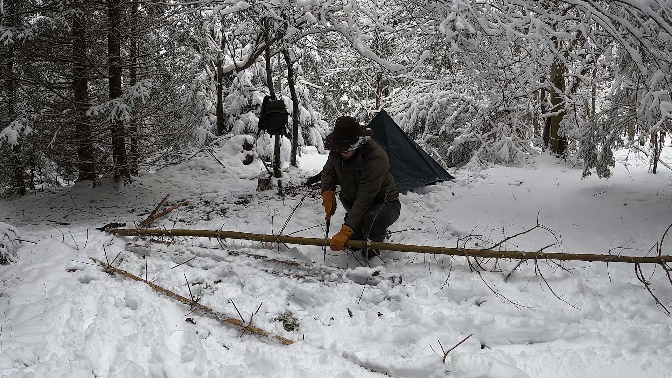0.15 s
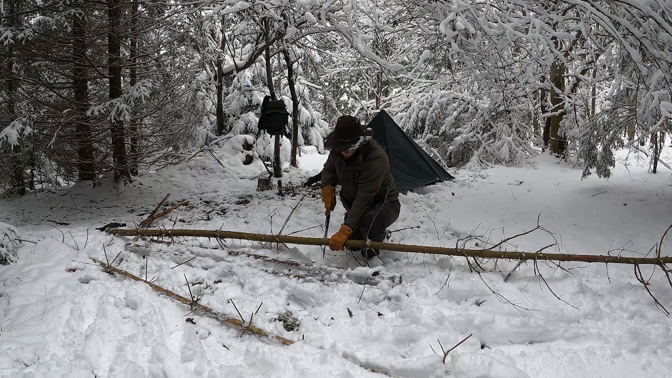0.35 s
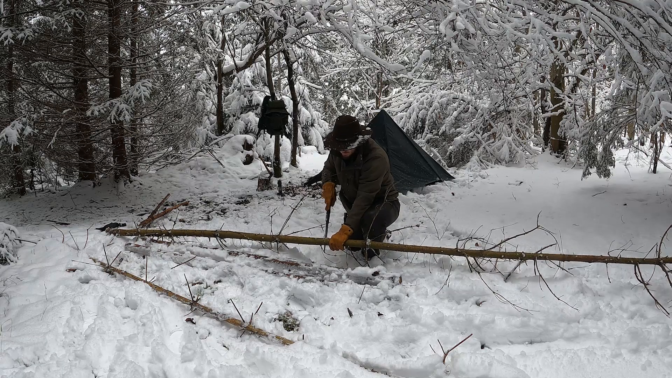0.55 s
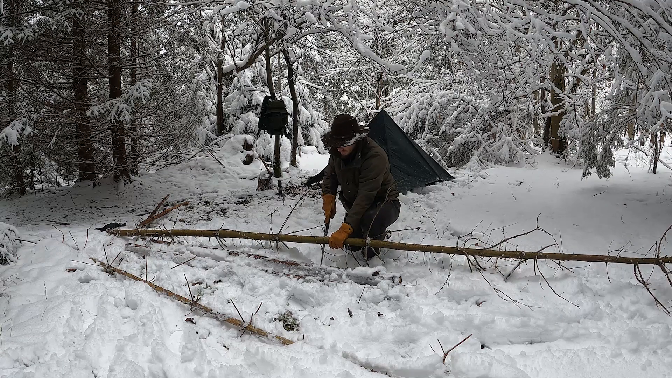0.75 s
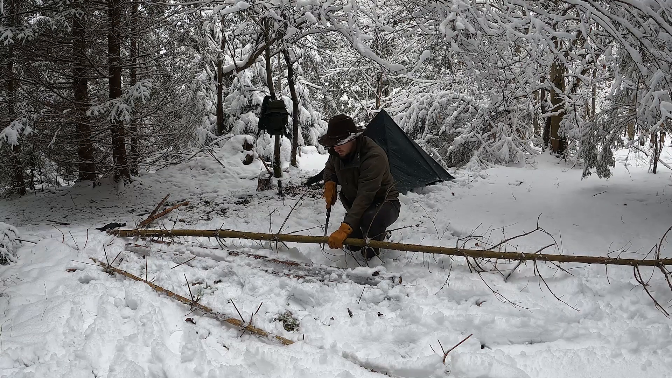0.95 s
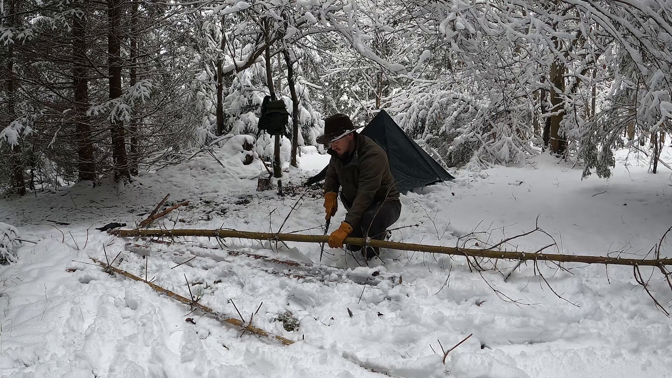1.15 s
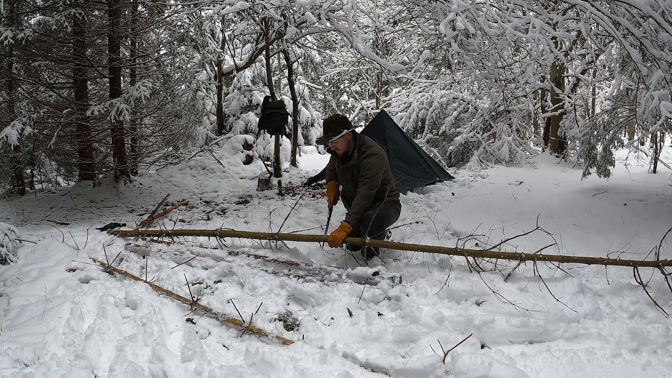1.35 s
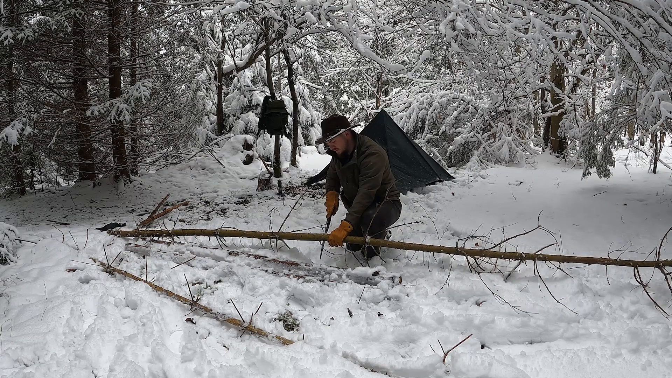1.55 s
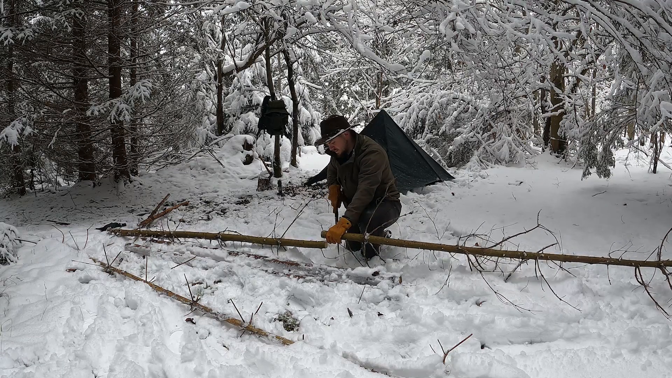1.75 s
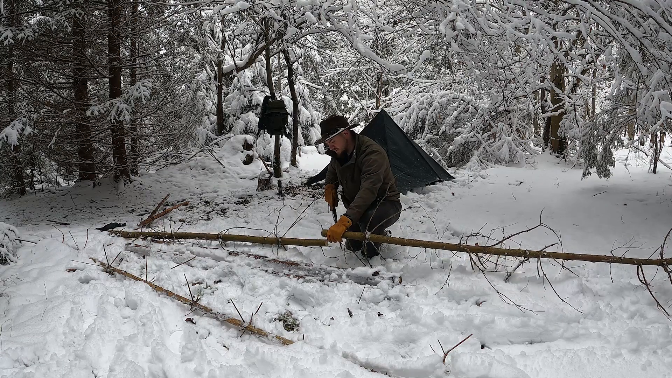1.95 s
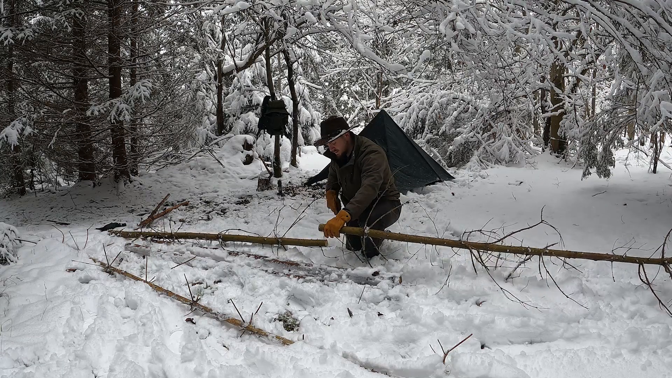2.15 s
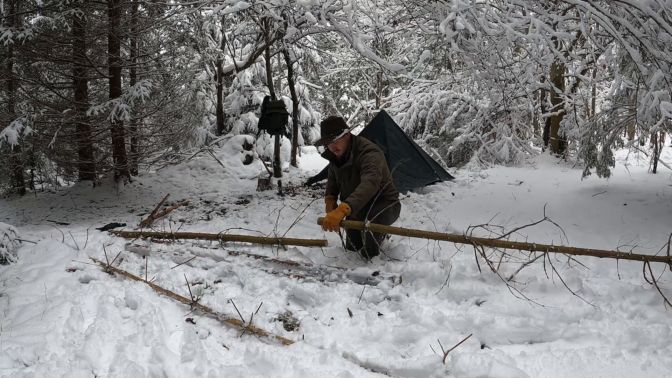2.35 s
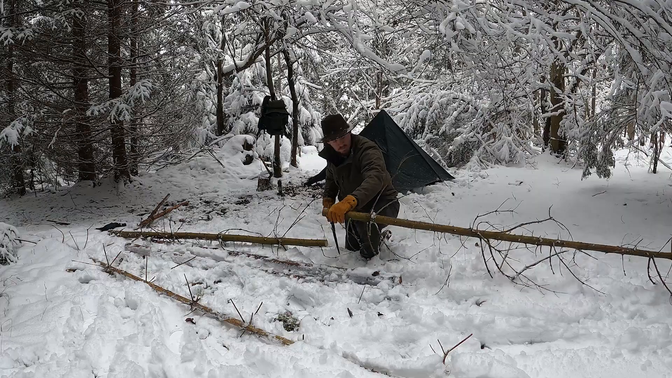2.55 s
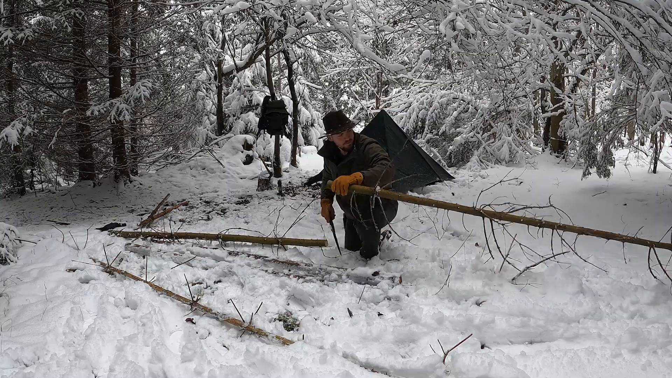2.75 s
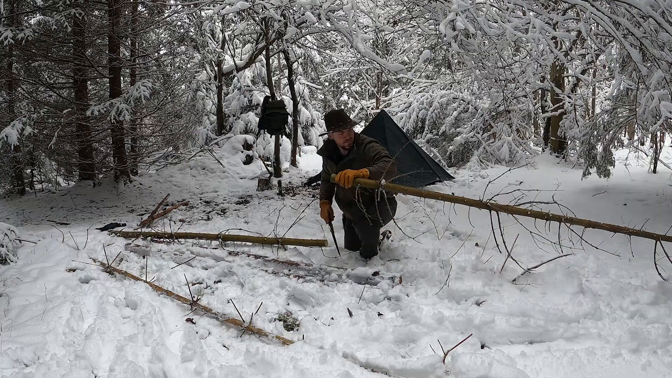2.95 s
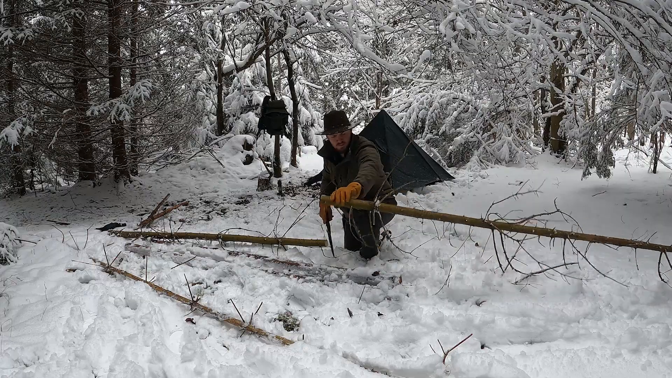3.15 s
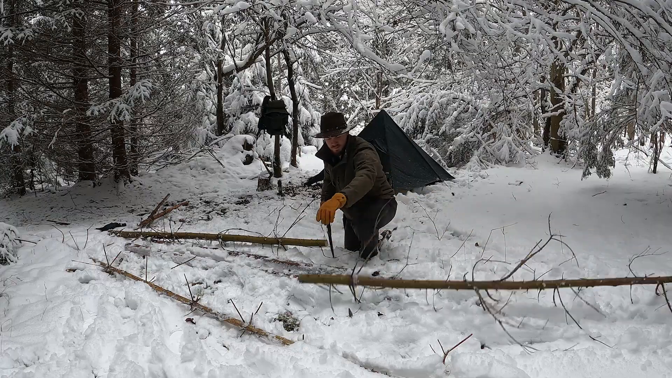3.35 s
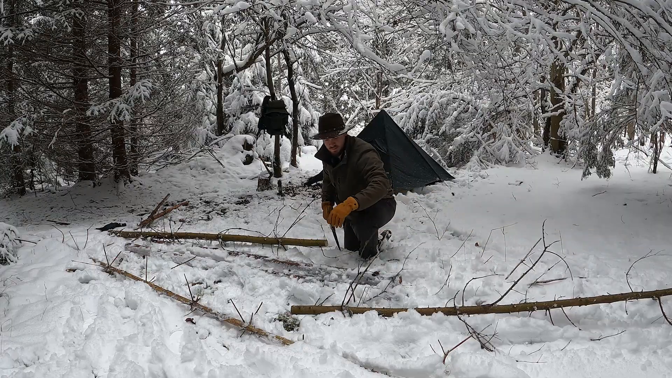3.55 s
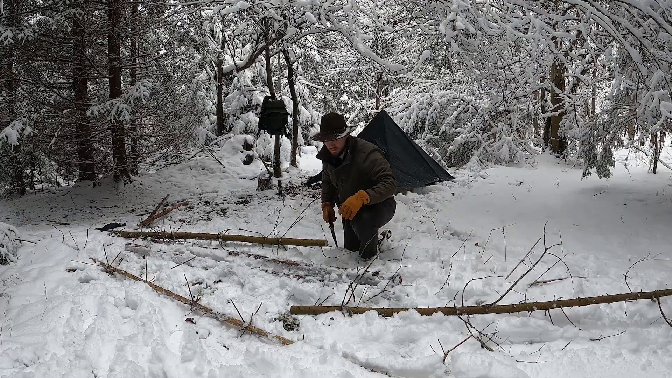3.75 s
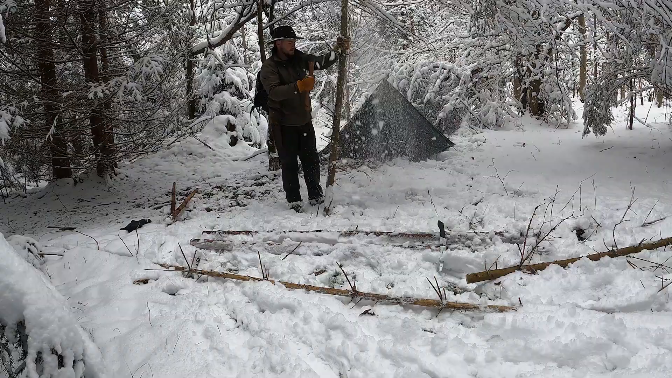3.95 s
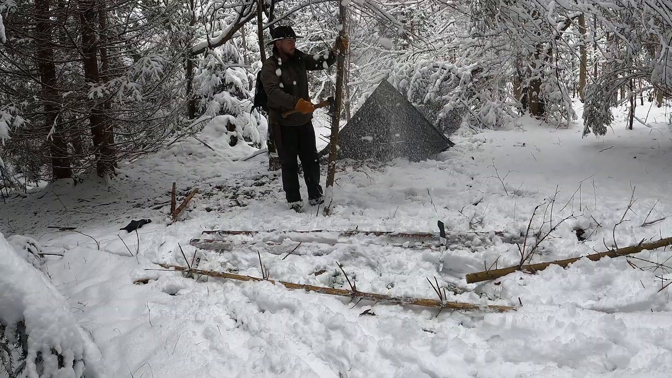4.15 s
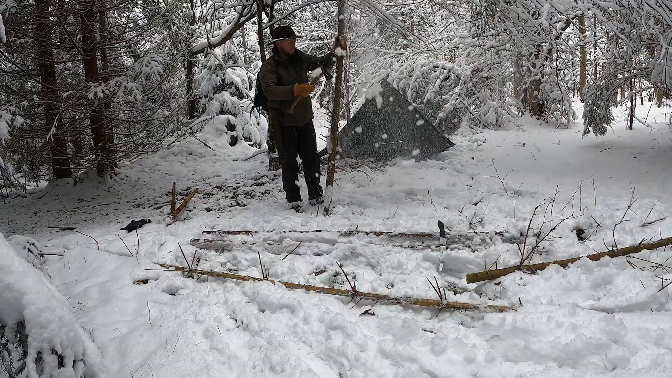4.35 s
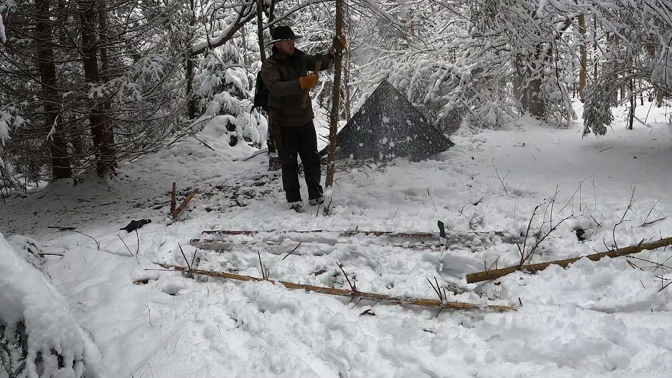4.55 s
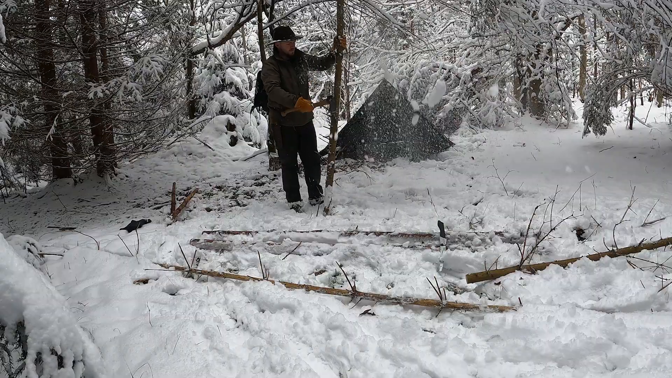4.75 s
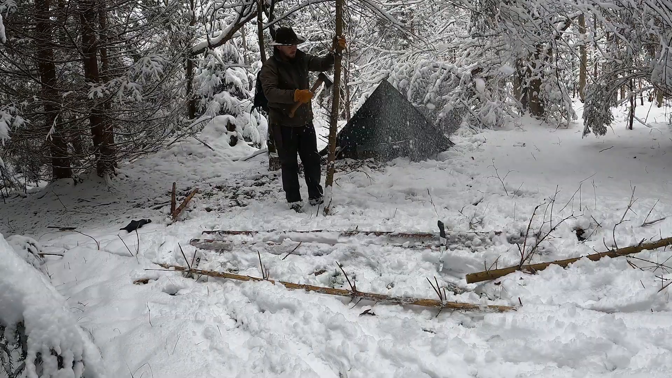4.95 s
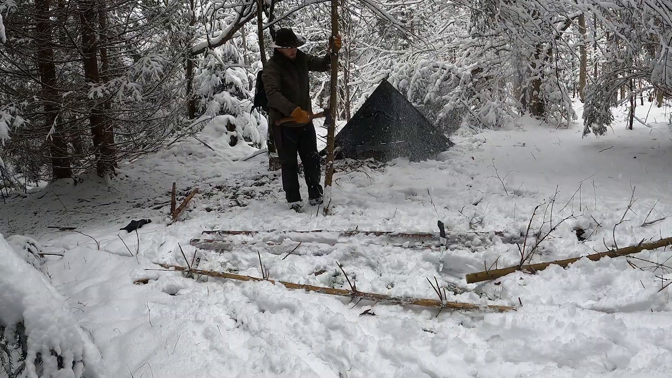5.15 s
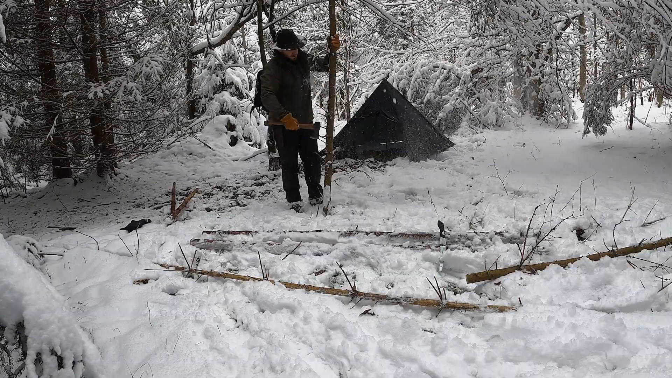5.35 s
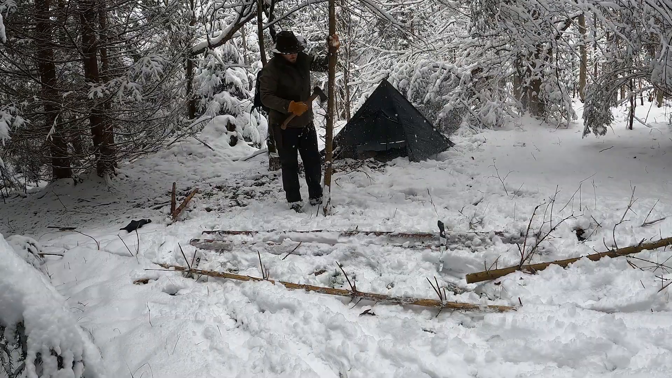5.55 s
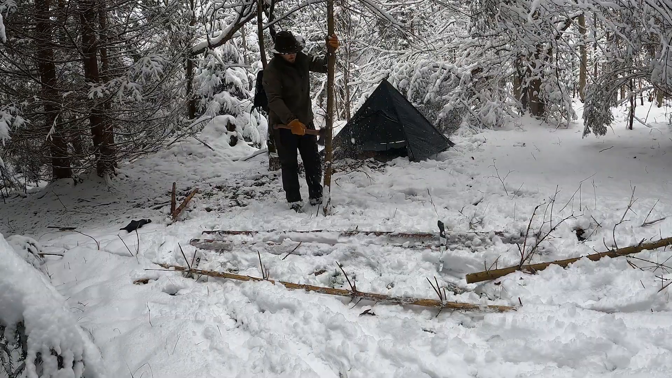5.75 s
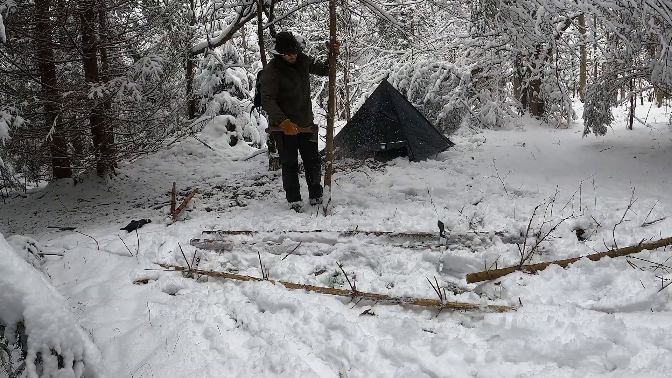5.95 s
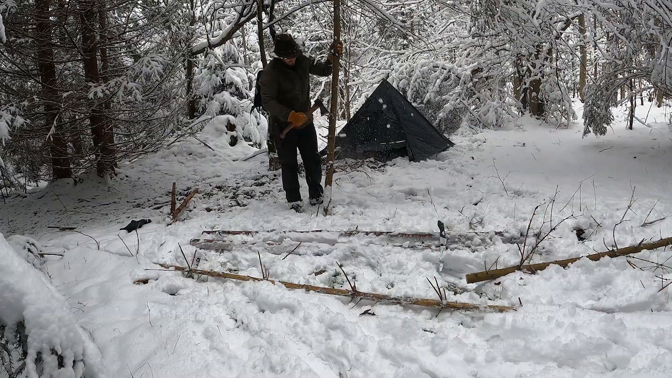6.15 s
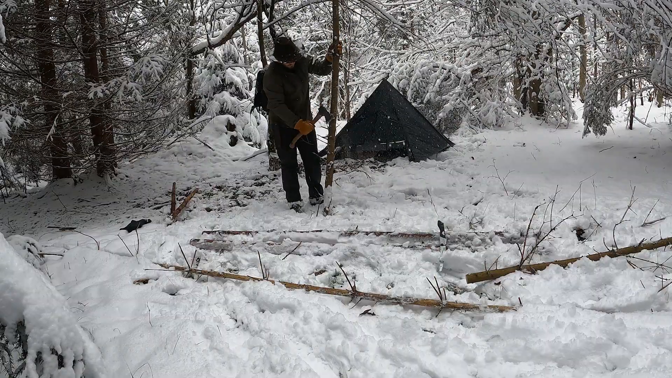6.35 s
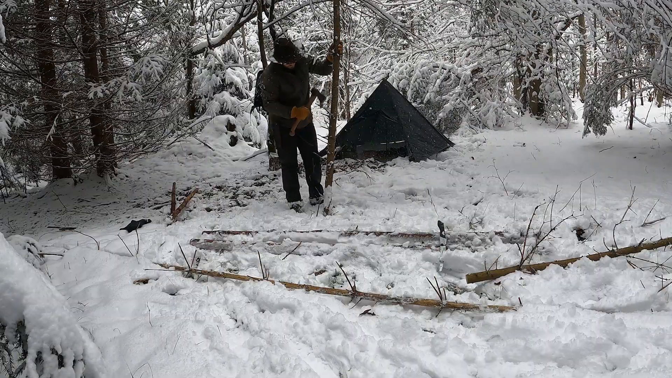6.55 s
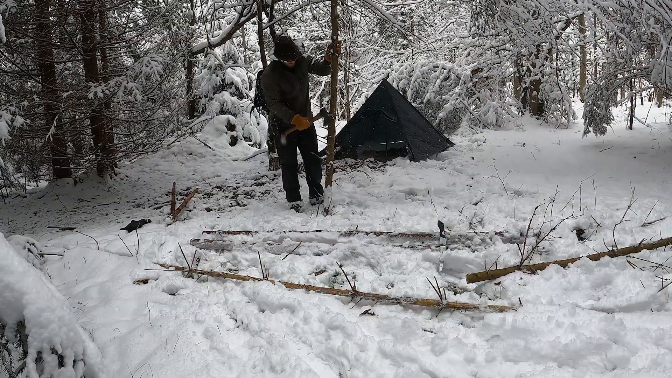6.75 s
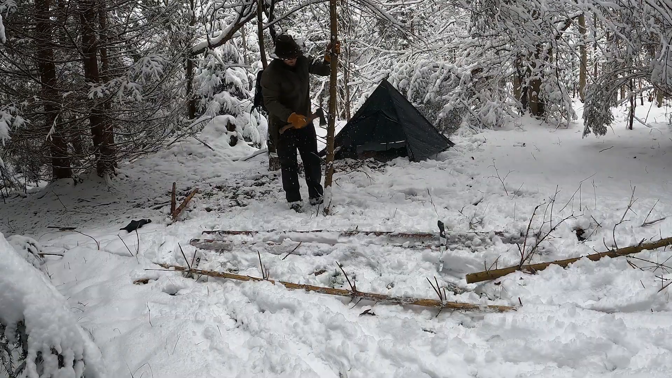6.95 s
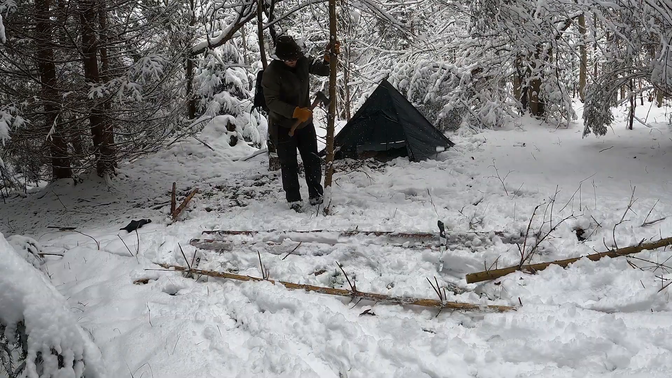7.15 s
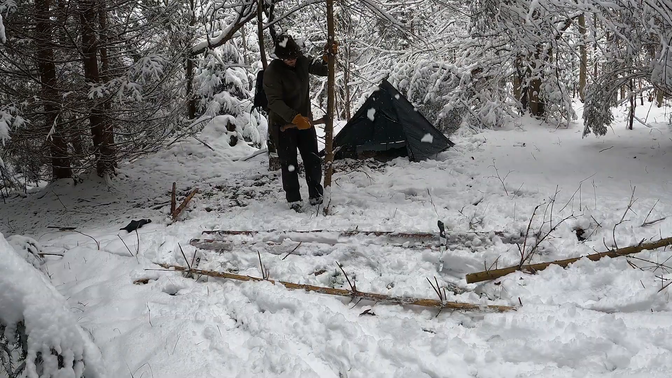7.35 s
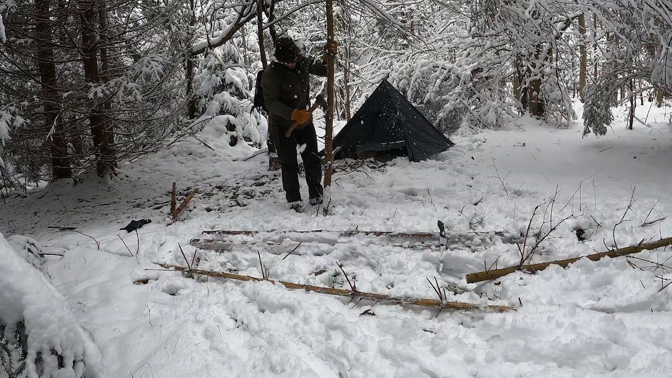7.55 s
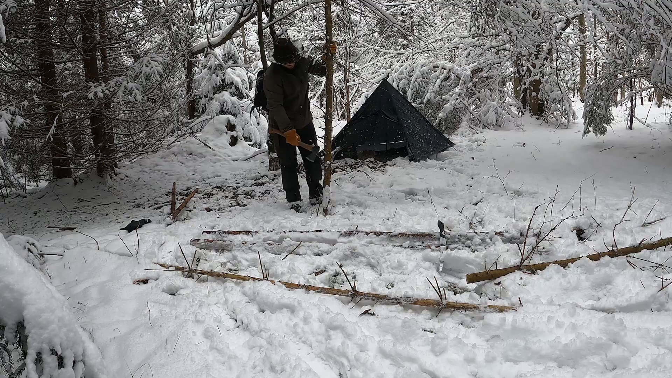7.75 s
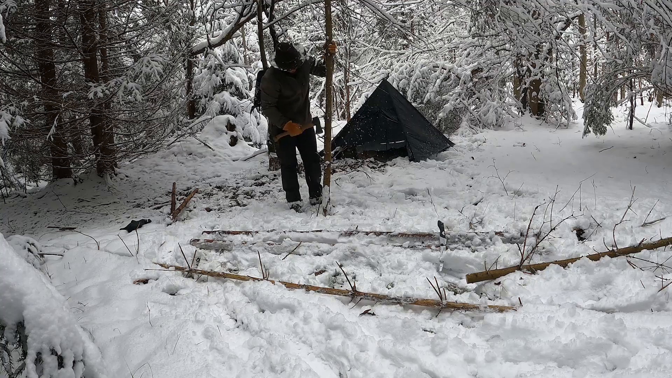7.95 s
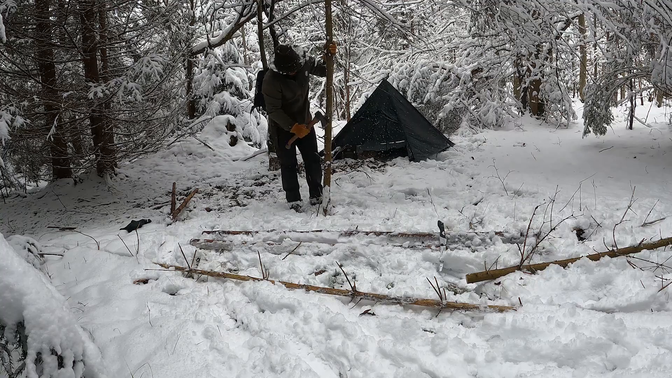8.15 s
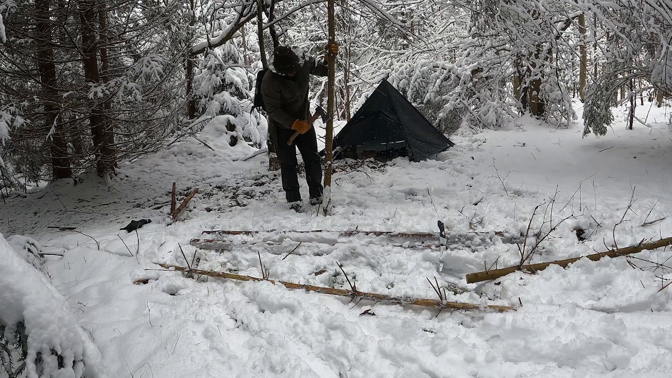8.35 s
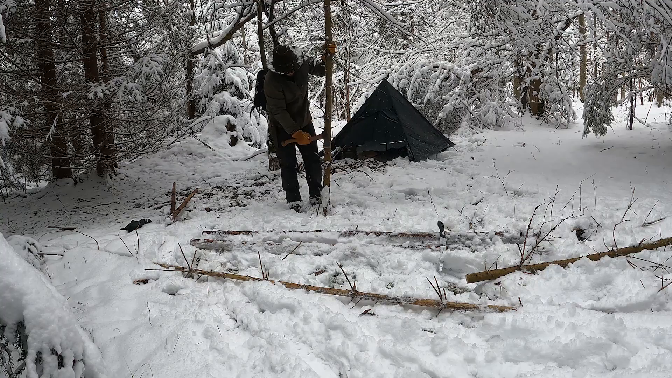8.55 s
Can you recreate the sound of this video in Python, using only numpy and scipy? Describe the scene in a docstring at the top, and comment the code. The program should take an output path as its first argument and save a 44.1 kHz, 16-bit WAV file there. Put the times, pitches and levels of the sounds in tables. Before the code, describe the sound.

A hand saw rasps through a thin pole, the cut top cracks down into snow, then a hatchet knocks off dry twigs outdoors.

```python
"""Sawing and trimming poles in a snowy forest

A hand saw cuts a thin pole, made of uneven noise rung through pole and blade; the top is thrown down, twigs cracking.
Then a hatchet trims dry branches: noise bursts for knocks and snaps, sine tones for twigs and a short steel ring.
Twigs and snow rustle down as lumpy stereo noise, with soft noise puffs where wood meets snow.
Drops of snow thump on the microphone housing as short sinking tones; filtered noise rumbles far off."""
import sys
import numpy as np
from scipy import signal
from scipy.fft import rfft, irfft, next_fast_len
from scipy.io import wavfile
from scipy.ndimage import uniform_filter1d, map_coordinates

SR = 44100
rng = np.random.default_rng(int(sys.argv[2]) if len(sys.argv) > 2 else 0)


def master(y):
    """Save y as 16-bit WAV."""
    cut = np.clip(np.atleast_2d(y).T, -1, 1)
    pcm = np.round(cut * 32767)  # scale
    wavfile.write(sys.argv[1], SR, pcm.astype(np.int16))


N = 378819

# saw strokes, pull and push in turn: fastest_s, slowing_s, level_db, blade_over_wood_db
SAW_STROKES = [(.03, 0.057, -43.5, -5.5), (.205, 0.052, -41, -7), (.335, 0.088, -41, -2.5),
               (.52, 0.055, -39.5, -5), (.66, 0.092, -40.5, -2.5), (.85, 0.066, -41.5, -3.5),
               (1.005, 0.097, -39.5, -3), (1.21, .064, -46, -1), (1.357, 0.091, -40.5, -1),
               (1.565, 0.06, -46, -4), (1.69, 0.057, -50.5, -6.5), (1.8, 0.29, -53, -4)]
SPEED_UP_S = 0.091  # every stroke takes this long to reach full speed
# the pole as it rings under a pull and under a push: pitch_hz, width_hz, relative_level_db
POLE_PULLED = [(540, 130, -9.5), (677, 29, 0), (982, 182, 1.5), (1370, 454, -2.5), (2060, 900, -12.5)]
POLE_PUSHED = [(450, 140, -9), (688, 40, -0.5), (868, 45, 3), (1080, 260, -2), (2210, 1500, -18)]
# the saw blade: pitch_hz, width_hz, relative_level_db
SAW_BLADE = [(2890, 850, -1), (4500, 980, 1), (5180, 560, 2), (6860, 900, -2.5), (8330, 2320, -8.5)]

# far drone and light wind on the two microphone ports: time_s, drone_db, wind_db
RUMBLE_LEVELS = [(0.0, -64.5, -71), (1.8, -57, -77), (2.36, -66, -75), (3.28, -68, -78.5),
                 (3.73, -69.5, -63.5), (4.3, -63.5, -71.5), (6.62, -77.5, -77), (6.88, -68.5, -65),
                 (7.13, -75, -77), (8.59, -71, -77.5)]
# tone balance of the drone and of the wind: frequency_hz, relative_level_db
DRONE_TONE = [(70, -63), (135, -7.5), (200, -1), (310, -9.5), (490, -23.5), (900, -36.5)]
WIND_TONE = [(15, -27.5), (30, -4), (130, -21), (200, -72.5)]

# branches dragged and clothing, under everything: time_s, twigs_db, snow_hiss_db
SLOW_STIR = [(1.92, -67.5, -76), (2.18, -71, -70), (2.53, -73, -74.5), (2.82, -64, -64.5),
             (3.05, -72.5, -78.5), (3.5, -58, -60), (3.69, -59.5, -76), (3.83, -74.5, -70.5),
             (4.12, -69, -64.5), (4.41, -74, -71.5), (4.67, -71, -66.5), (5.04, -75, -70.5),
             (5.5, -66, -68.5), (6.15, -79.5, -75), (6.5, -58.5, -64), (6.8, -79, -78), (8.1, -64, -70),
             (8.5, -78, -75.5)]
# the pole is jolted and sheds twigs and snow: start_s, shaking_lasts_s, twigs_db, snow_hiss_db
SHAKES = [(3.485, 0.097, -56.5, -51.5), (4.18, 0.093, -51, -57), (4.729, 0.026, -53.5, -57),
          (4.847, .01, -55, -54), (5.281, 0.01, -41, -39), (5.582, 0.023, -56.5, -59.5),
          (5.799, .07, -48, -50.5), (6.002, 0.047, -58.5, -60), (6.194, .005, -59, -64.5),
          (6.363, 0.0072, -52.5, -58.5), (6.586, 0.029, -60.5, -61), (6.872, 0.0062, -45.5, -49.5),
          (7.338, 0.055, -50, -56.5), (7.761, 0.0059, -44.5, -50), (8.002, 0.015, -54.5, -65),
          (8.25, 0.0094, -56.5, -59), (8.432, 0.019, -65.5, -69.5), (8.59, 0.012, -62, -59.5)]
JOLT_DB_PER_S = 500  # how fast a shower comes
TWIGS_SETTLE_DB_PER_S, SNOW_SETTLE_DB_PER_S = 162, 177.5
# tone balance of twigs, sifting snow and the cut top swept over snow: frequency_hz, relative_level_db
TWIG_TONE = [(300, -15.5), (500, -10.5), (850, -15), (1100, -5.5), (1900, -6), (4200, -17.5), (6000, -44)]
SNOW_TONE = [(2500, -43), (3500, -15), (5300, 1), (7400, -2.5), (12200, -22), (14000, -34.5)]
SWEEP_TONE = [(1650, -36), (2800, -5.5), (5850, -4.5), (6930, -4), (12000, -15.5), (13800, -26),
              (15000, -45.5)]
THROWN_S = 3.83  # until here the hiss is the swept top, then snow sifting from the standing pole
SWEEP_PAN_DB = -1.5  # left minus right

# how long the trunks' answer lasts: frequency_hz, time_to_fall_60_db_s
TREE_DECAY = [(300, 0.24), (2200, 0.3), (10000, 0.14)]
# how loudly the trunks answer: frequency_hz, level_db
TREE_ECHO = [(300, -24), (2200, -20), (12000, -18)]

# tooth catches, cracks and snaps, peaking 2.5 ms after start_s:
# start_s, base_level_db, twig_pitch_hz, relative_treble_db, burst_time_to_fall_60_db_s
BLOWS = [(.369, -28.5, 5200, -5, 0.011), (.958, -26, 4960, -7, .012), (1.01, -20, 1165, -9.5, 0.02),
         (1.065, -26, 4100, -13.5, 0.013), (1.412, -35.5, 4000, -3, .012), (1.645, -39, 3020, -4, .015),
         (1.658, -46, 7400, 3, .02), (1.735, -38, 1470, 1, 0.023), (1.823, -34, 1840, -6, 0.018),
         (1.857, -39, 1900, -23.5, 0.03), (1.898, -30, 1446, -21, 0.025), (2.56, -42, 1100, 2, 0.011),
         (3.527, -13.5, 3290, 1.5, 0.015), (3.566, -10.5, 1610, -9.5, 0.016), (3.575, -22, 7100, 5, 0.009),
         (4.177, -36.5, 2700, -3, 0.028), (4.277, -34.5, 1480, -2.5, 0.024),
         (4.287, -36.5, 6540, 3, 0.0057), (4.729, -36.5, 2200, 9.5, 0.021), (4.857, -22, 2486, 1, 0.026),
         (4.872, -29, 1540, -14, 0.015), (5.257, -21, 2140, -2, 0.053), (5.276, -10, 2900, -20.5, 0.011),
         (5.295, -14, 2100, 0, 0.018), (5.324, -29.5, 6630, -6.5, 0.047), (5.341, -28.5, 4500, -3, 0.017),
         (5.402, -31.5, 4600, -17, .015), (5.568, -37.5, 1860, -6.5, 0.026),
         (5.791, -31.5, 2250, -9, 0.043), (5.807, -26, 2510, 1.5, 0.026), (5.863, -28.5, 2240, -2, .023),
         (5.896, -38.5, 2750, 6, .023), (6.181, -42.5, 1950, -18.5, 0.018), (6.306, -42, 2300, -10, 0.02),
         (6.368, -37, 2140, -9.5, 0.04), (6.854, -26.5, 2350, 7.5, 0.021), (6.857, -30, 1020, 4.5, 0.026),
         (6.913, -36.5, 2200, -4, 0.051), (6.921, -30.5, 2260, -8, .03), (6.982, -46.5, 1340, -29, .023),
         (7.306, -39.5, 2630, -19, .025), (7.315, -12, 2680, -5.5, 0.01), (7.319, -26, 1083, 2.5, 0.026),
         (7.397, -28, 2130, -10, 0.022), (7.717, -49.5, 6500, 9, 0.022), (7.731, -36.5, 6700, 0, 0.03),
         (7.746, -32, 2340, 2, 0.022), (7.752, -25, 2580, 4.5, .015), (7.757, -24.5, 2140, -7.5, 0.0225),
         (7.791, -16, 3180, -7, .02), (7.869, -37, 1140, -45, 0.015), (7.99, -26, 2130, -3.5, 0.015),
         (8.061, -35.5, 1670, -43, 0.0098), (8.12, -48, 1870, -1.5, .023), (8.215, -43.5, 1390, -3, 0.012),
         (8.249, -29, 2280, 5.5, 0.025)]
SWELL = .2  # rise time of a burst as a share of its fall time
SNAP_T60_S = .0008  # time for the sharp front to fall 60 dB
# dull knocks that go into the trunk: start_s, base_level_db
KNOCKS = [(3.527, -47.5), (4.177, -42), (4.211, -51), (4.278, -42.5), (4.713, -47), (4.77, -48.5),
          (4.857, -47.5), (4.87, -46), (5.245, -43.5), (5.809, -38.5), (6.983, -54), (7.307, -47.5),
          (7.315, -44), (7.718, -44), (7.731, -47), (7.752, -41)]
KNOCK_T60_S = 0.035  # time to fall 60 dB
# what the blows and knocks ring: pitch_hz, width_hz, relative_level_db
TRUNK = [(286, 170, 4), (399.5, 150, 7.5), (710, 400, -1)]
SPLINTERING_WOOD = [(1140, 1100, 2.5), (2450, 1400, 12.5), (4270, 2000, 3.5)]
EARLY_TREBLE = [(5000, 530, -6.5), (8050, 1500, -2)]  # earlier blows: tooth catches of the saw and cracks of the falling top
LATE_TREBLE = [(4430, 400, -6.5), (6085, 1740, 8.5), (6600, 1500, 9), (7730, 260, 4), (11600, 4200, -14)]  # blows after THROWN_S

# drops on the housing: start_s, starting_level_db, left_minus_right_db
DROPS = [(0.946, -39.5, -9), (1.397, -32.5, -10), (2.304, -34.5, -10.5), (2.833, -50.5, -14.5),
         (5.635, -41, -10), (6.324, -40.5, -10.5)]

# wood bumps into deep snow: start_s, level_before_soft_rise_db
THUDS = [(3.574, -45.5), (3.86, -50), (5.252, -43.5), (6.87, -50.5), (7.311, -47), (7.75, -57),
         (8.424, -56.5)]
# tone balance of a bump: frequency_hz, relative_level_db
THUD_TONE = [(30, -18.5), (70, -3.5), (160, 0), (260, -6), (450, -32.5)]
THUD_RISE_S, THUD_T60_S = .008, 0.19  # rise constant; time to fall 60 dB

# the hatchet head rings free: start_s, base_level_db
HEAD_RINGS = [(6.914, -41), (7.402, -53), (7.793, -47)]
# its tones: pitch_hz, average_relative_level_db, time_to_fall_60_db_s
HEAD_TONES = [(6670, 7.5, 0.062), (12900, -8, 0.19)]

# by how much the left port leads for near work: frequency_hz, lead_radians
LEFT_LEAD = [(900, -.15), (3200, -.8), (5400, -.35), (7800, -.5), (11400, -.1), (12800, 2.1), (15400, .2)]
# balance of near work: frequency_hz, left_minus_right_db
LEFT_TILT = [(200, -0.5), (10000, -0.5), (12900, -6), (15000, -3)]
TOP_HZ = 16300  # nothing passes from here up

HALVES = np.array([[.5], [-.5]])  # shares a difference: half to the left, minus half to the right


def amp(db):
    """Turn a level in dB into a gain."""
    return 10 ** (np.asarray(db) / 20)


def unit(x):
    """Scale x to an rms of 1."""
    return x / np.sqrt(np.mean(x ** 2) + 1e-20)


def along(points, hz):
    """Read a curve of (Hz, value) points on a log frequency axis."""
    f, v = np.transpose(points)
    return np.interp(np.log(hz + 1), np.log(f + 1), v)


def curves(rows):
    """Give one value per sample for each column after the time."""
    s, *columns = np.transpose(rows)
    return [np.interp(np.arange(N) / SR, s, column) for column in columns]


def wobble(rate):
    """A smooth random curve with `rate` random points a second."""
    points = rng.standard_normal(int(N * rate / SR) + 4)
    return map_coordinates(points, [np.arange(N) * rate / SR])


def filtered(x, response):
    """Pass x through a response given as a function of frequency."""
    m = next_fast_len(N + SR // 2)
    return irfft(rfft(x, m) * response(np.fft.rfftfreq(m, 1 / SR)), m)[..., :N]


def unit_gain(response):
    """Scale a response so that it keeps the power of white noise."""
    return response / np.sqrt(np.mean(abs(response) ** 2))


def body(modes):
    """An object that rings at several pitches, each starting only once it is struck."""
    def response(f):
        total = 0
        for k, (center, width, db) in enumerate(modes):
            ring = 1j * f * width / (center * center - f * f + 1j * f * width)
            total = total + (-1) ** k * amp(db) * ring  # every other one is upside down
        return unit_gain(total)
    return response


def gritty(rate, depth_db, patchy_db=0, size=5):
    """Noise with random swells, `rate` points a second, and patches of pitch `size` steps of 1.5 ms long."""
    z = signal.stft(rng.standard_normal(N), nperseg=128)[2]
    patches = uniform_filter1d(rng.standard_normal(z.shape), size=3, axis=0)
    patches = uniform_filter1d(patches, size=size, axis=1)
    noise = signal.istft(z * amp(patchy_db * unit(patches)), nperseg=128)[1][:N]
    return unit(noise * amp(depth_db * wobble(rate)))


def pair(spectrum, alike, grit):
    """Stereo noise of rms 1: a shared part and a part that differs between the ports."""
    turn = np.arccos(np.clip(alike, 0, 1)) / 2
    mid, side = filtered(np.array([grit(), grit()]), lambda hz: amp(along(spectrum, hz)))
    return unit(np.cos(turn) * mid + np.sin(turn) * side * [[1], [-1]])


def saw():
    """Teeth tear fibres unevenly; each bite shakes pole and blade, louder the faster the blade runs."""
    t = np.arange(N) / SR
    teeth = gritty(480, depth_db=2.4, patchy_db=3, size=7)
    teeth += (rng.random(N) < 40 / SR) * rng.normal(0, 6, N)  # about 40 times a second a tooth catches
    wood = [unit(filtered(teeth, body(modes))) for modes in (POLE_PULLED, POLE_PUSHED)]
    steel = unit(filtered(teeth, body(SAW_BLADE))) * amp(1.5 * wobble(23.52))  # the blade binds and frees
    out = np.zeros(N)
    for k, (fastest, slowing, db, blade_db) in enumerate(SAW_STROKES):
        ramp = np.interp(t, [fastest - SPEED_UP_S, fastest, fastest + slowing], [0, 1, 0])
        speed = np.sin(np.pi / 2 * ramp)
        bite = speed ** (1.3, 2.2)[k % 2]  # a pull bites at once, a push only at speed
        out += amp(db) * bite * (wood[k % 2] + amp(blade_db) * steel)
    return out


def rumble():
    """A far drone that wavers, and light wind on the ports, both as low stereo noise."""
    drone_db, wind_db = curves(RUMBLE_LEVELS)
    drone = pair(DRONE_TONE, .65, lambda: gritty(20, depth_db=1.5))
    wind = pair(WIND_TONE, 0.73, lambda: gritty(26, depth_db=0.5))
    return amp(drone_db) * drone + amp(wind_db) * wind


def shaking():
    """Levels in dB of twigs and snow: each jolt comes fast, holds and settles, over the slow stir."""
    t = np.arange(N) / SR
    power = amp(2 * np.array(curves(SLOW_STIR)))
    settle = np.array([[TWIGS_SETTLE_DB_PER_S], [SNOW_SETTLE_DB_PER_S]])
    for s, lasts, twigs_db, hiss_db in SHAKES:
        at = slice(round((s - .2) * SR), round((s + .6) * SR))
        before = np.maximum(s - t[at], 0)
        after = np.maximum(t[at] - s - lasts, 0)
        loss_db = JOLT_DB_PER_S * before + settle * after
        power[:, at] += amp(2 * (np.array([[twigs_db], [hiss_db]]) - loss_db))
    return 10 * np.log10(power)


def rustle():
    """Shaken twigs crackle and loose snow hisses down; the harder the shaking, the lumpier the sound."""
    twigs_db, hiss_db = shaking()
    lumps_db = np.clip((twigs_db + 76.0) / 25, 0, 1) * 2.4 * wobble(300)
    twigs = pair(TWIG_TONE, 0.71, lambda: gritty(240, depth_db=0.0, patchy_db=2.6, size=30))
    sift = pair(SNOW_TONE, 0.78, lambda: gritty(240, depth_db=0.84, patchy_db=2.5))
    # the swept top is the same hiss with another tone balance
    sweep = unit(filtered(sift, lambda hz: amp(along(SWEEP_TONE, hz) - along(SNOW_TONE, hz))))
    early = np.arange(N) < THROWN_S * SR
    hiss = np.where(early, sweep, sift)
    both = amp(twigs_db + lumps_db) * twigs + amp(hiss_db + lumps_db) * hiss
    return both * amp(early * SWEEP_PAN_DB * HALVES)


def trees(x):
    """Scattered answer of the trunks, slightly delayed; each frequency dies at its own speed."""
    hz, t, z = signal.stft(rng.standard_normal((2, SR // 2)), SR, nperseg=256)
    fade = amp(-60 * t / along(TREE_DECAY, hz)[:, None])
    tail = signal.istft(z * fade, SR, nperseg=256)[1]
    delayed = np.pad(x, (300, 0))[None]  # 300 samples, about 7 ms
    return signal.fftconvolve(delayed, tail / np.linalg.norm(tail[0]), axes=1)[:, :N]


def blows():
    """Blows burst into branch and treble resonances and ring one twig each; knocks sound the trunk."""
    burst, twig = np.zeros((4, N + SR)), np.zeros(N + SR)  # rows: trunk, wood, early and late treble
    t = np.arange(-SR // 100, SR // 8) / SR
    for s, db, hz, treble_db, t60 in BLOWS:
        start = round((s + .0025 + t[0]) * SR)
        at = slice(start, start + len(t))
        slope = np.where(t < 0, -t / SWELL, t) / t60
        snap = 1.1 * amp(-60 * abs(t) / SNAP_T60_S)
        shape = amp(db) * (amp(-60 * slope) + snap)
        treble_row = 2 + int(s > THROWN_S)
        burst[[1, treble_row], at] += shape * rng.standard_normal(len(t)) * amp([[-9], [treble_db - 5]])
        # thinner twigs ring higher and shorter, light taps ring a little less
        ring_db = db - 3.5 + 0.022 * (db + 29.5)
        ring_fade_db = -60 * slope * (hz / 2800) ** 0.42
        twig[at] += amp(ring_db + ring_fade_db) * (t > 0) * np.sin(2 * np.pi * hz * t)
    for s, db in KNOCKS:
        knock = amp(db + 8 - 60 * abs(t) / KNOCK_T60_S) * (t > 0)
        burst[0, round((s + t[0]) * SR):][:len(t)] += knock * rng.standard_normal(len(t))
    bodies = (TRUNK, SPLINTERING_WOOD, EARLY_TREBLE, LATE_TREBLE)
    return twig[:N] + sum(filtered(b[:N], body(modes)) for b, modes in zip(burst, bodies))


def drops():
    """A drop pushes the housing: a tick that sinks at once into a slow swing."""
    out, t = np.zeros((2, N + SR)), np.arange(SR // 8) / SR
    turns = 32 * t + 1.14 * (1 - np.exp(-t / 0.0027))  # pitch falls quickly to 32 Hz
    thump = np.sin(2 * np.pi * turns) * amp(-60 * t / 0.052)
    for s, db, pan_db in DROPS:
        start = round(s * SR)
        out[:, start:start + len(t)] += amp(db + pan_db * HALVES) * thump
    return out[:, :N]


def thuds():
    """Deep snow softens each bump of wood to a low puff of noise without a ring."""
    shape, t = np.zeros(N + SR), np.arange(SR // 2) / SR
    for s, db in THUDS:
        puff = amp(db - 60 * t / THUD_T60_S) * (1 - np.exp(-t / THUD_RISE_S))
        shape[round(s * SR):][:len(t)] += puff
    return shape[:N] * pair(THUD_TONE, .9, lambda: rng.standard_normal(N))


def head():
    """The steel hatchet head rings in a few thin tones, uneven in strength from hit to hit."""
    out, t = np.zeros(N + SR), np.arange(SR // 4) / SR
    for s, db in HEAD_RINGS:
        ring = np.zeros(len(t))
        for hz, level, t60 in HEAD_TONES:
            ring += amp(level + rng.normal(0, 2.6) - 60 * t / t60) * np.sin(2 * np.pi * hz * t)
        out[round(s * SR):][:len(t)] += amp(db) * ring * (1 - np.exp(-t / 0.0022))
    return out[:N]


def scene():
    """Near work reaches the two ports with small shifts in timing and level; the rest is added."""
    work = saw() + blows() + head()
    # the top moves aside, then the work returns
    aside = np.interp(np.arange(N) / SR, [2, 3, THROWN_S, THROWN_S + .1], [0, 1, 1, 0])

    def port_response(hz):
        return amp(HALVES * along(LEFT_TILT, hz)) * np.exp(1j * HALVES * along(LEFT_LEAD, hz))

    ports = amp(HALVES * aside * SWEEP_PAN_DB) * filtered(work, port_response)
    echo = trees(filtered(work, lambda hz: amp(along(TREE_ECHO, hz))))
    return ports + echo + rustle() + thuds() + drops() + rumble()


def record(dry):
    """The microphone fades in the top octave, and nothing is kept from the band limit up."""
    return filtered(dry, lambda hz: (hz < TOP_HZ) / (1 + (hz / 14100) ** 12))


dry = scene()
out = record(dry)
master(out)
```